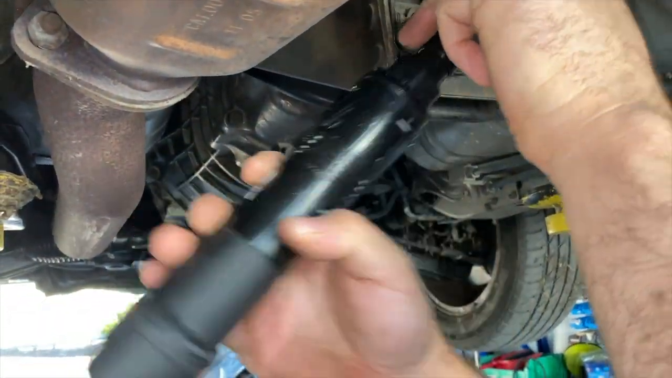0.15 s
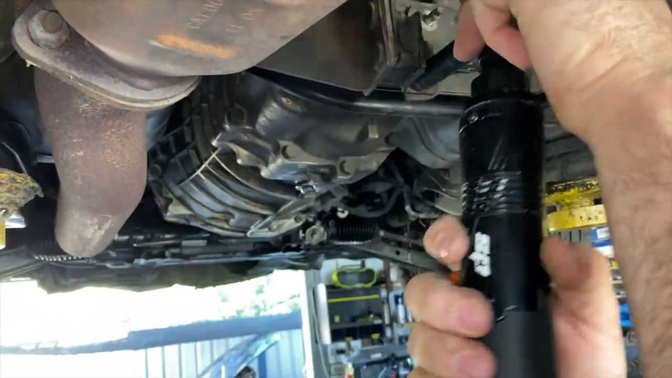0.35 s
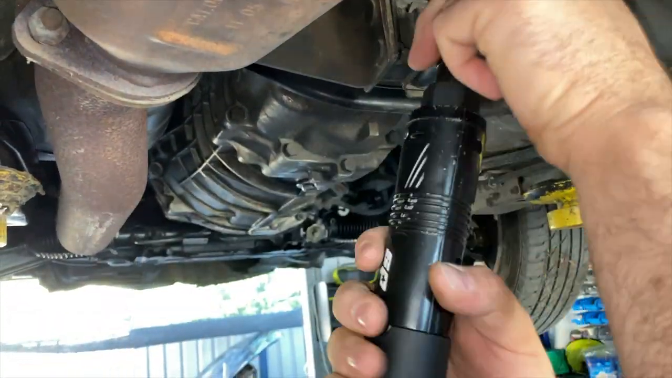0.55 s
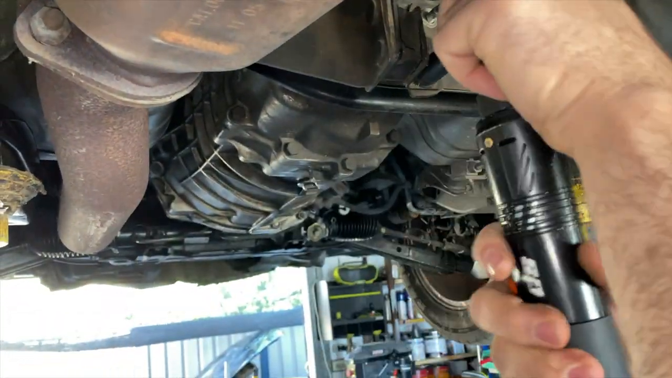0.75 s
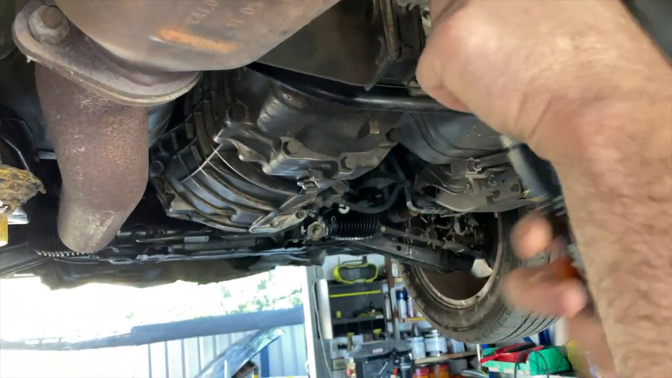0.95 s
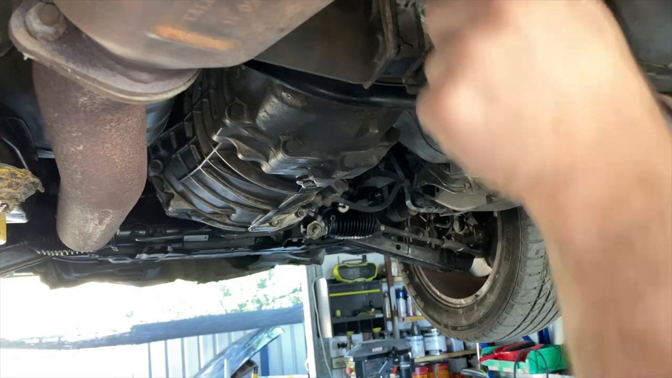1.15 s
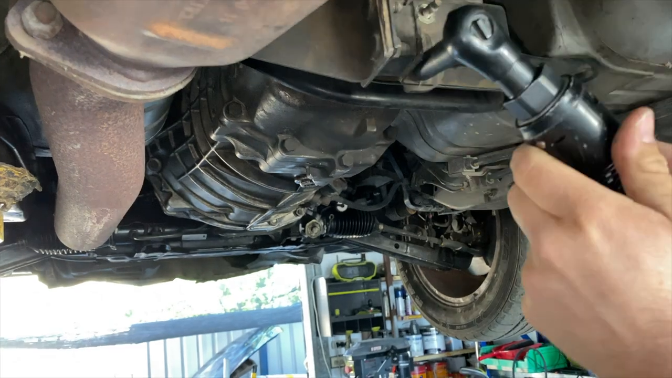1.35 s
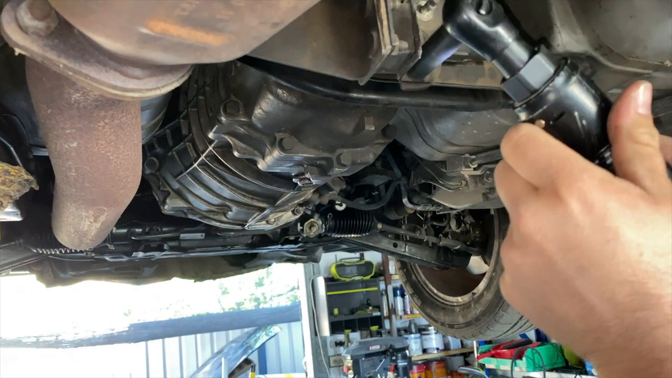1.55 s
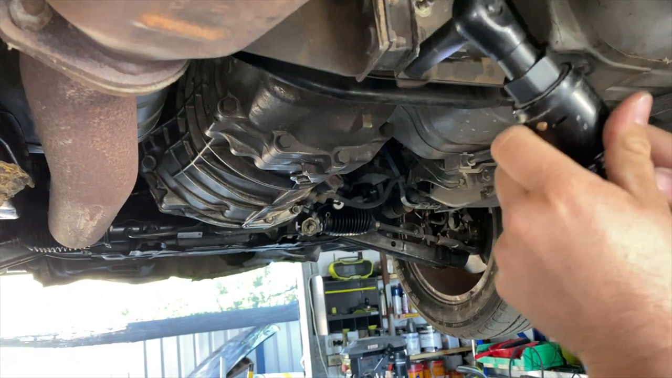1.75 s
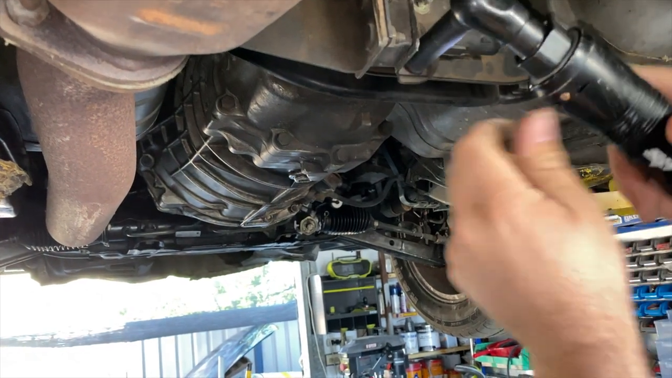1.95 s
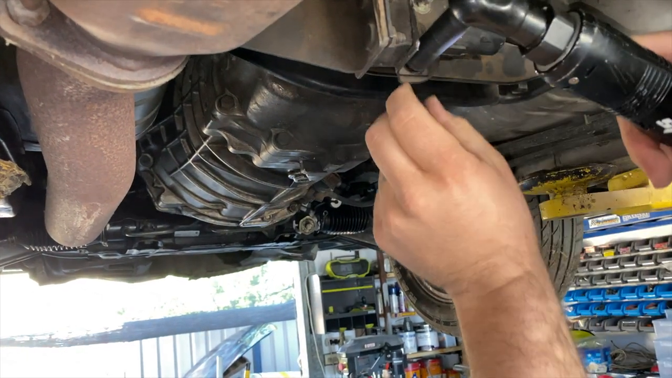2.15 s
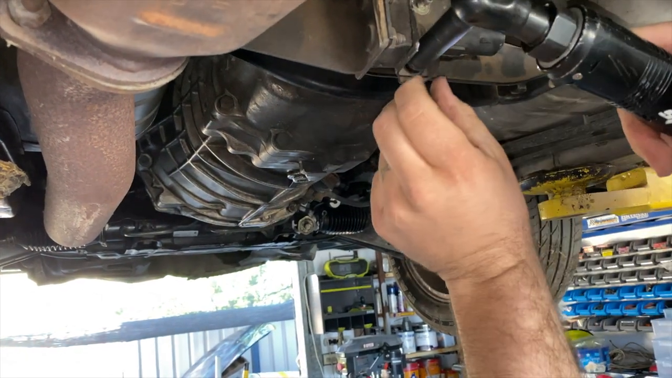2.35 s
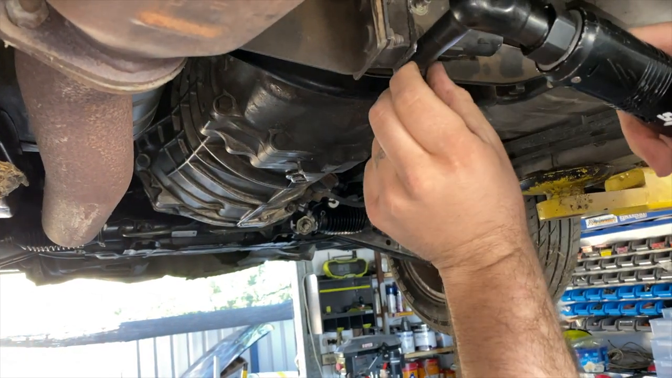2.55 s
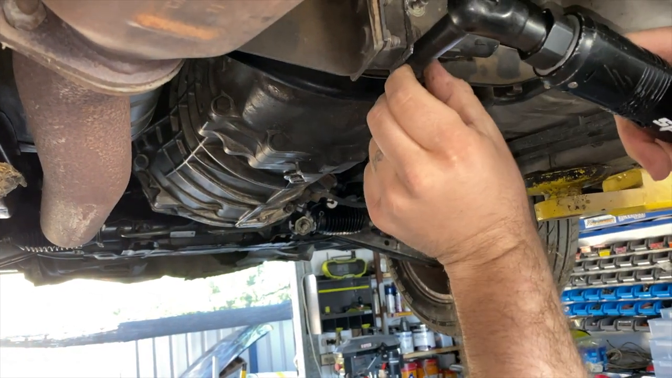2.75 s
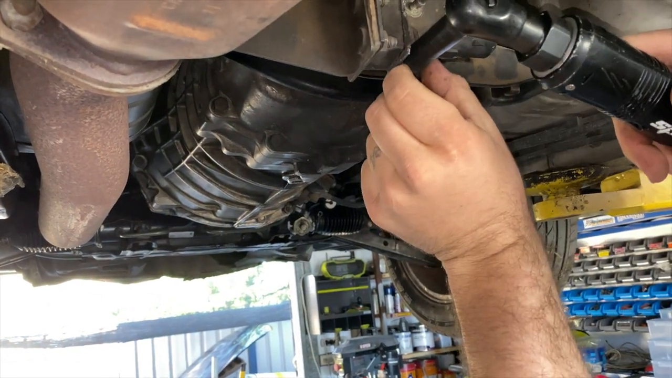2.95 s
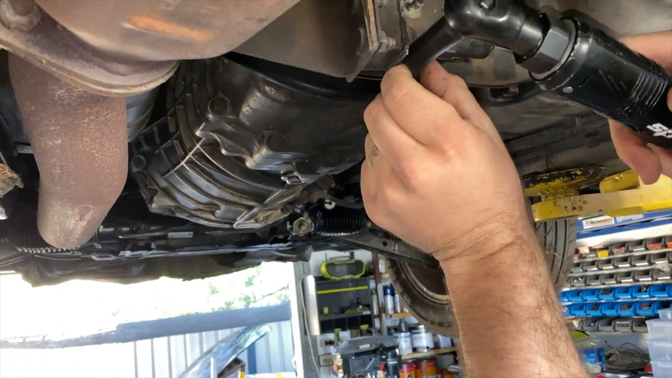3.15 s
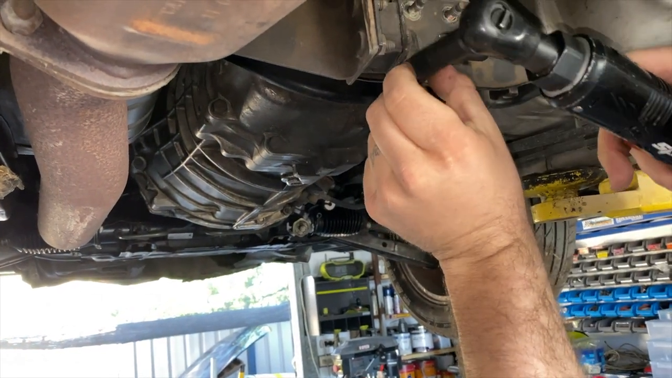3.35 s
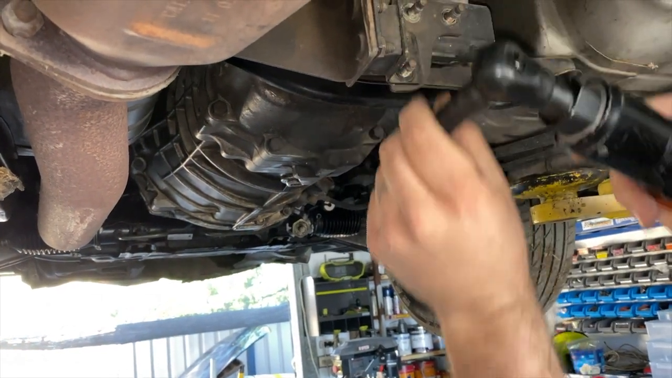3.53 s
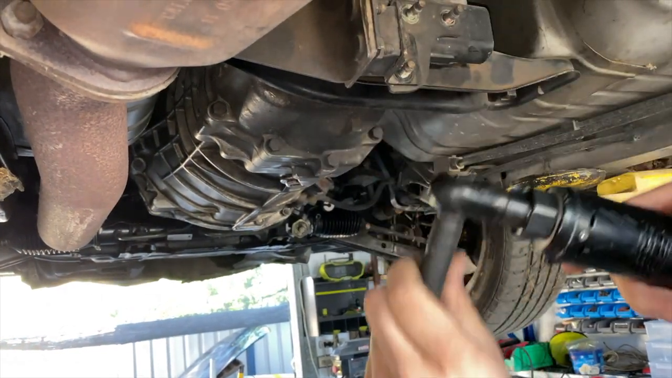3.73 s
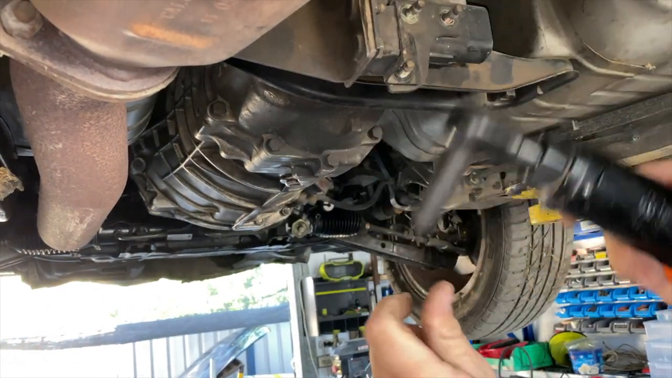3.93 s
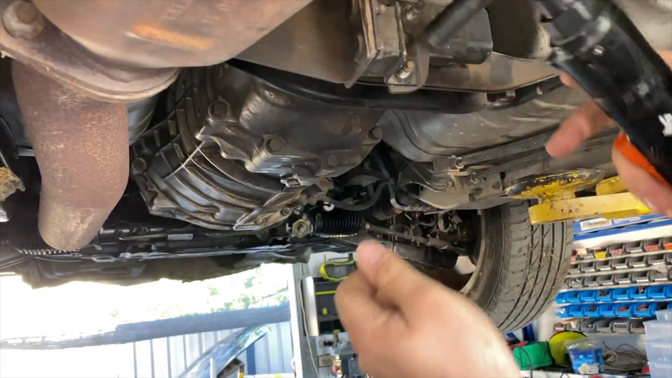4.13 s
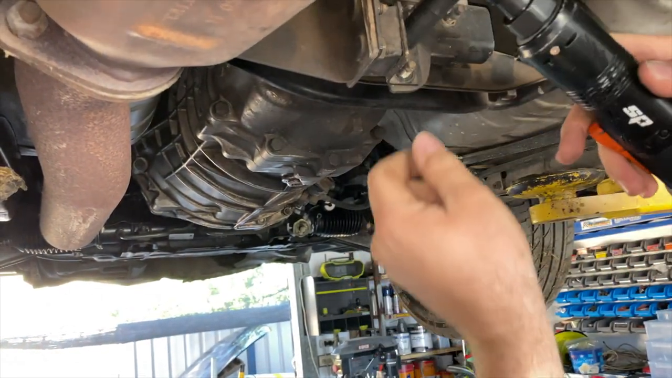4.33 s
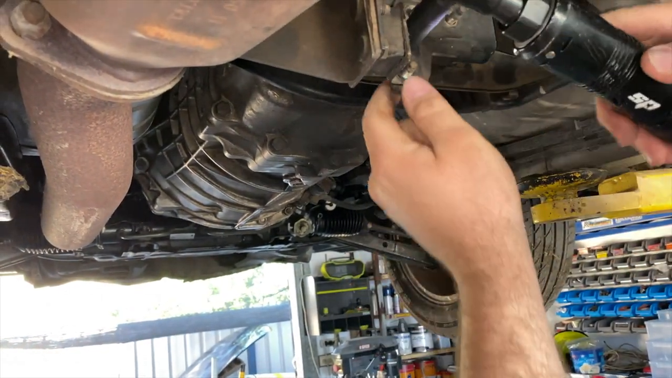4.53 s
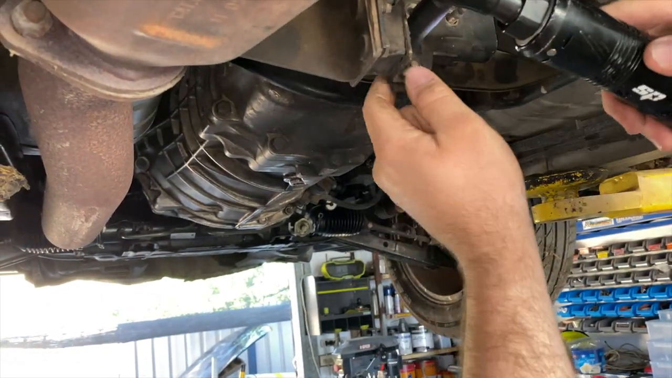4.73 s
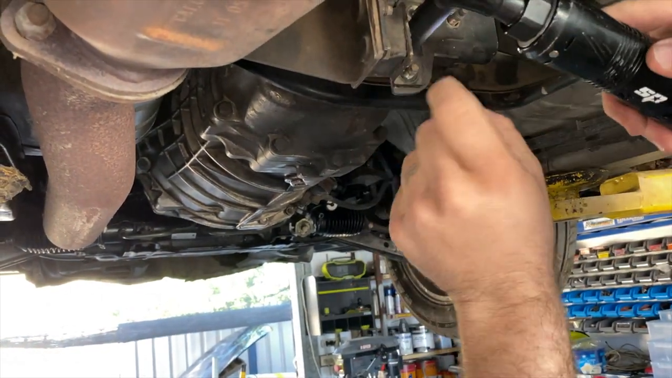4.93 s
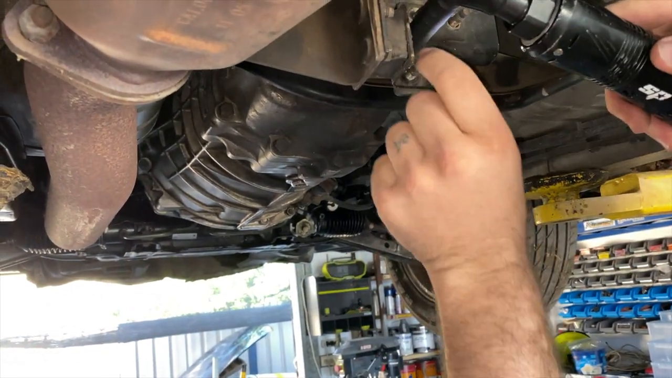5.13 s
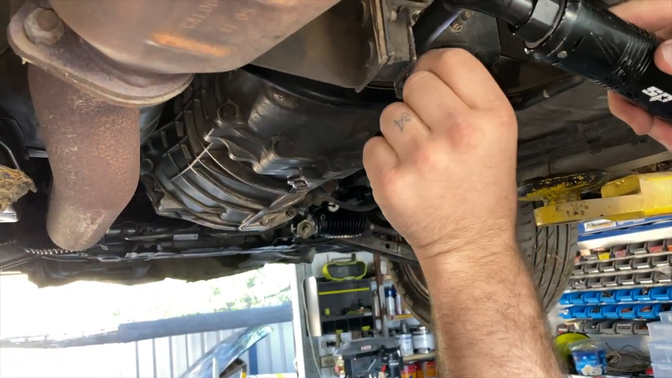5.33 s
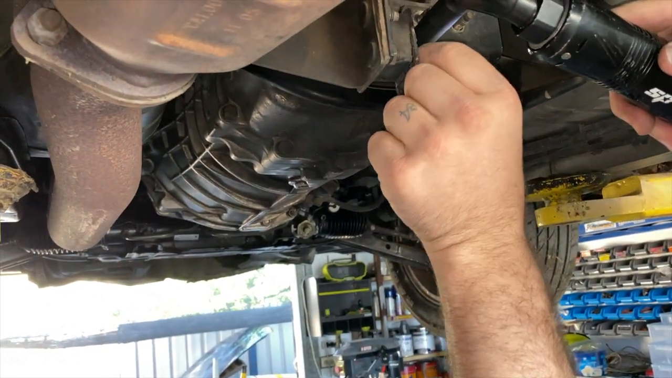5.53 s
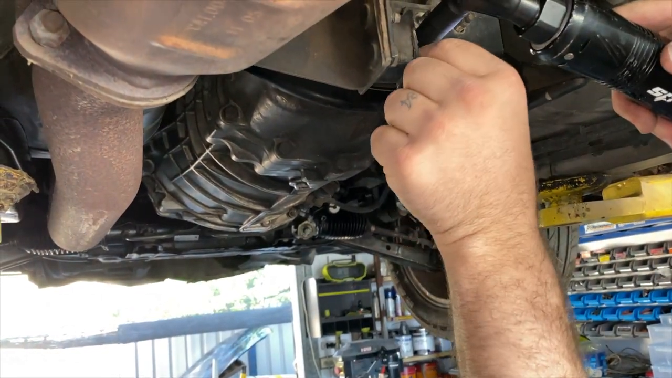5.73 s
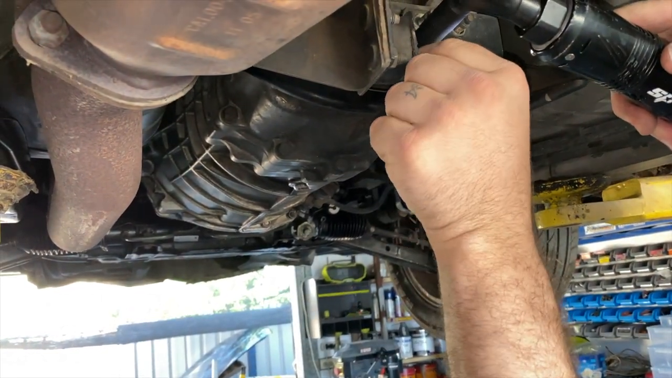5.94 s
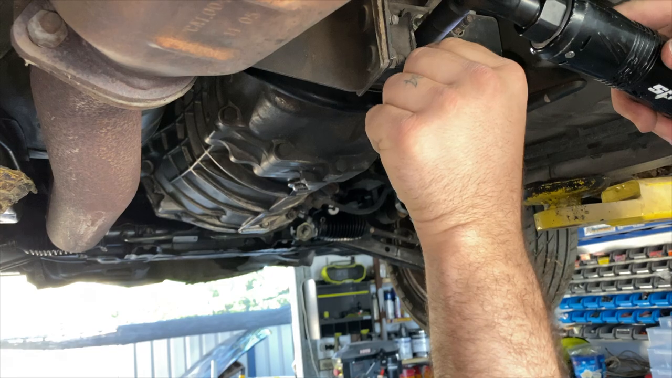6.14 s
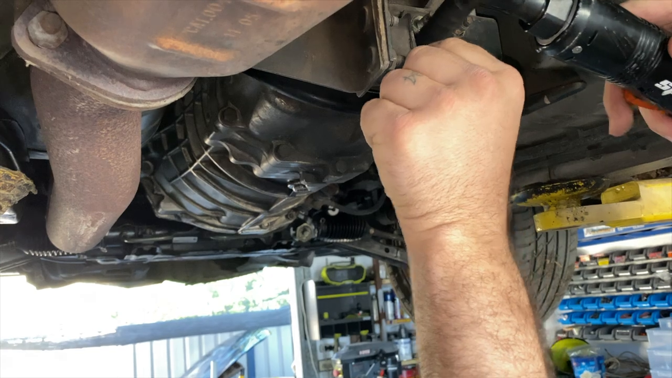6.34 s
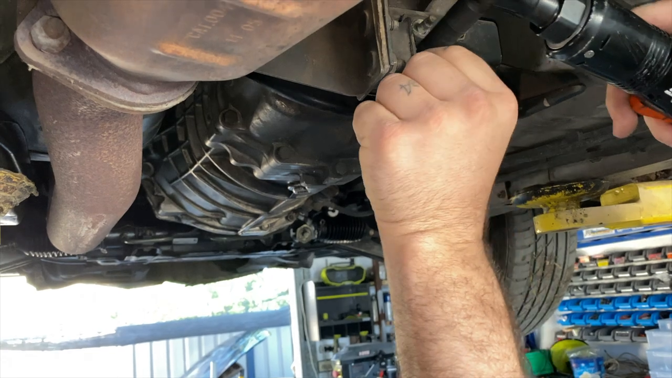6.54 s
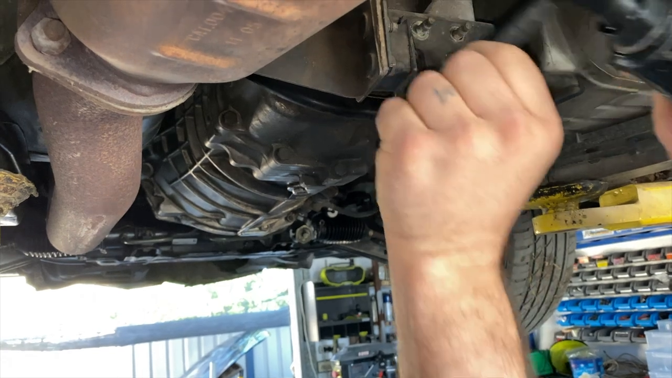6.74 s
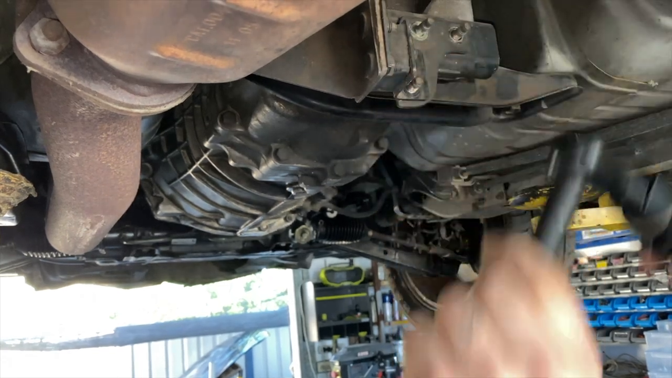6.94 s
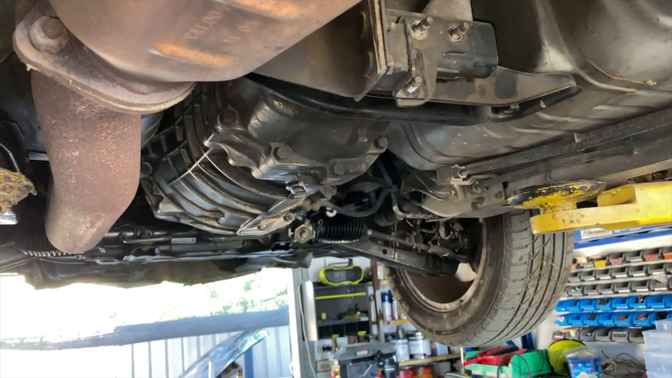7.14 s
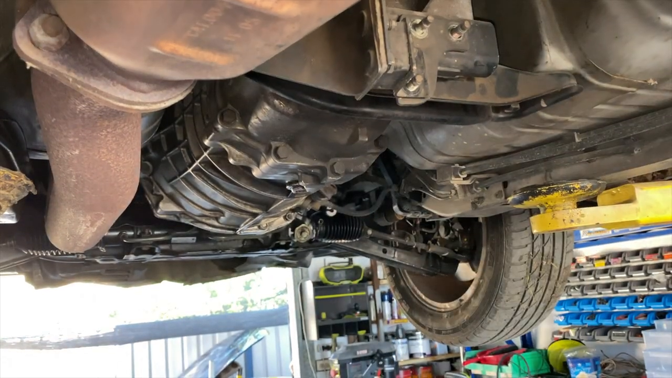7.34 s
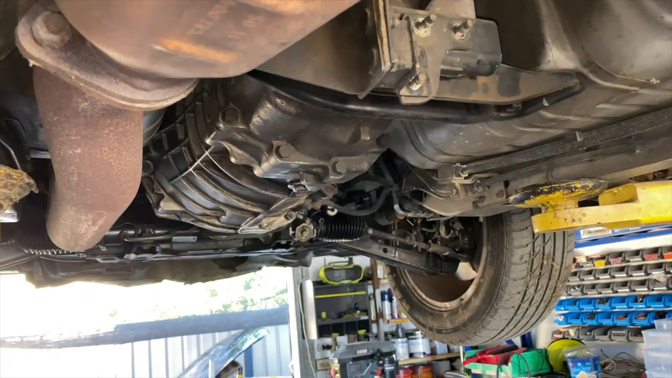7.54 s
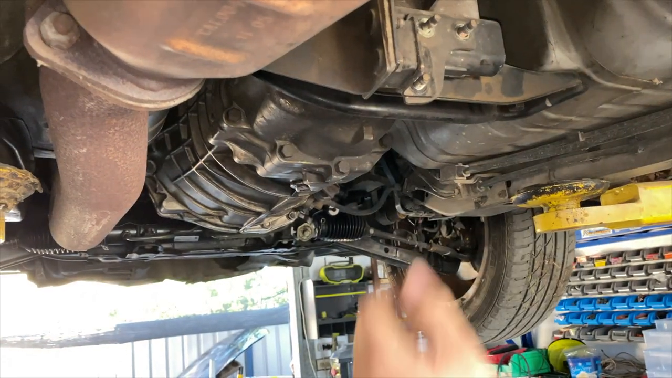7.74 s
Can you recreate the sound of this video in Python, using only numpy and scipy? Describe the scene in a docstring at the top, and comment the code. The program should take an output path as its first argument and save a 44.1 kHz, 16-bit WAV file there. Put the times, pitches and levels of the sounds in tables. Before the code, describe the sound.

In a quiet garage, metal clanks and ticks lead into two harsh, rattling power ratchet bursts, the second duller and easing as its bolt loosens.

```python
"""A knock dies away in a quiet garage; more follow as a socket meets bolt and bracket under a car on a hoist.
Each is a burst of steel-contact noise plus decaying modes, and it leaves the big underbody panels humming.
A sleeve brushes past on the left, as filtered noise. Then a cordless ratchet spins out two bolts: trains of
impacts at about 90 strokes a second excite the resonances of the tool and, through the bolt, of the underbody.
After each run the head coasts down to a few single pawl clicks. A short echo follows knocks and tool."""
import sys
import numpy as np
from scipy import signal
from scipy.fft import rfft, irfft, next_fast_len
from scipy.io import wavfile
from scipy.ndimage import map_coordinates

SR = 44100
rng = np.random.default_rng(int(sys.argv[2]) if len(sys.argv) > 2 else 0)


def generate_wav(sig):
    """Save sig (samples, or channels by samples) to the path in sys.argv[1] as 16-bit PCM at SR."""
    pcm = np.round(np.clip(np.atleast_2d(sig).T, -1, 1) * 32767).astype(np.int16)
    wavfile.write(sys.argv[1], SR, pcm)


N = 347494
TOP_HZ = 15800  # upper band limit


def amp(db):
    """Level law: amplitude ratio of a level in dB."""
    return 10 ** (np.asarray(db) / 20)


def unit(x):
    """Normalisation to an RMS of one."""
    return x / np.sqrt(np.mean(x ** 2) + 1e-20)


def along(points, hz):
    """Interpolation of (f/Hz, value) points on a logarithmic frequency axis."""
    f, value = np.transpose(points)
    return np.interp(np.log(hz + 1), np.log(f + 1), value)


def resonances(modes, hz):
    """Energy summation: gain of (f/Hz, width/Hz, level/dB) resonances whose powers add."""
    power = 0
    for centre, width, db in modes:
        detuning = (hz * hz - centre * centre) / ((hz + 1) * width)
        power = power + amp(db) ** 2 / (1 + detuning ** 2) ** (3 / 2)
    return np.sqrt(power)


def coloured(x, gain):
    """Minimum-phase filtering: x takes on this gain over frequency, keeping the power of white noise."""
    n = x.shape[-1]
    m = 2 * next_fast_len(n // 2 + 4096)
    g = np.maximum(unit(gain(np.fft.rfftfreq(m, 1 / SR))), 1e-5)
    # folding the cepstrum onto positive times makes the filter causal
    cepstrum = irfft(np.log(g))
    cepstrum[1:m // 2] *= 2
    cepstrum[m // 2 + 1:] = 0
    return irfft(rfft(x, m) * np.exp(rfft(cepstrum)), m)[..., :n]


def noise(size):
    """Incoherence: unrelated white noise for left and right."""
    return rng.standard_normal((2, size))


def add(track, s, sound):
    """Superposition: mix in a sound at time s; one that began before zero leaves only its tail."""
    start = round(s * SR)
    sound = sound[:, max(-start, 0):]
    part = track[:, max(start, 0):][:, :sound.shape[1]]
    part += sound[:, :part.shape[1]]


def waver(rate, depth_db):
    """Random modulation: a gain that wanders about 1, with rate knots a second."""
    knots = rng.standard_normal(1000)
    return amp(depth_db * map_coordinates(knots, [np.arange(N) * rate / SR], mode="mirror"))


def since(s):
    """Elapsed time in seconds since s, and zero before it."""
    return np.maximum(np.arange(N) / SR - s, 0)


def impact(crack_t60, scatter_db, scatter_t60, rise=0.00062):
    """Double decay: a steel contact cracks, then rings on densely among the parts nearby (times in s)."""
    t = np.arange(SR // 5) / SR
    decay = np.hypot(amp(-60 * t / crack_t60), amp(scatter_db - 60 * t / scatter_t60))
    return noise(len(t)) * (1 - np.exp(-t / rise)) * decay


def ping(hz, cycles, overtone_db=-7):
    """Free bending vibration: the two lowest modes of a steel piece fall 60 dB within so many cycles."""
    t = np.arange(SR // 8) / SR
    mode = lambda f: np.sin(2 * np.pi * (f * t + rng.random((2, 1))))
    # a high overtone is hardly struck
    overtone = amp(overtone_db) / (1 + (hz / 1600) ** 8) * mode(2.62 * hz)
    return (mode(hz) + overtone) * amp(-60 * t * hz / cycles) * (1 - np.exp(-t * hz / 2))


# background noise spectrum of the quiet garage: [f/Hz, relative level/dB]
AIR_SPECTRUM = [(30, -11), (130, -8), (350, -28), (1400, -29), (4000, -36), (15000, -44)]


def quiet_air(level_db):
    """Stationary random noise: the steady, bass-heavy background."""
    return amp(level_db) * coloured(noise(N), lambda hz: amp(along(AIR_SPECTRUM, hz)))


# broad resonances of underbody and bracket: [f/Hz, width/Hz, relative level/dB]
BODY_RESONANCES = [(492, 90, -7.5), (709, 170, -5), (887, 63, -7), (1020, 160, -8), (1277, 200, -2),
                   (1626, 210, -3), (2027, 56, -6), (2290, 430, -6), (2930, 290, -5), (3360, 310, -6.5),
                   (3630, 150, -3.5), (4210, 1100, -6.5), (6900, 3000, -14.5)]
# lasting modes of the underbody: [f/Hz, relative level/dB, t60/s]
STEEL_MODES = [(275, -20, 0.35), (393.3, -11, 0.26), (457, -16.5, 0.13), (497, -22.5, 0.4),
               (823, -2.5, 0.3), (869, -5, 0.27), (1123, -9.5, 0.13), (1251, -8.5, 0.13), (1592, -2, 0.1)]
# extra resonance in the ticks: [f/Hz, width/Hz, relative level/dB]
SOCKET_RESONANCE = [(10900, 900, -18)]
# socket meets bolt and bracket; the first knock is already dying away at the start:
# [t/s, relative level/dB, ring f/Hz, thud re knock level/dB, tick re knock level/dB]
KNOCKS = [(-0.04, -17, 1250, -7, -20), (0.045, -13.5, 1220, -9.5, -19), (0.062, -17.5, 1280, -19, -22),
          (0.166, -36.5, 5330, -20, -16), (0.21, -31.5, 1170, -28, -2), (0.234, -28, 1087, -8.5, -19),
          (0.282, -24.5, 1235, -3.5, -18), (0.29, -22, 1240, -3.5, -10.5), (0.312, -26, 1000, -10, -23),
          (0.33, -19, 1092, -16, -20), (0.469, -29.5, 1690, 0.5, -23), (0.567, -26, 1670, -7, -44),
          (0.591, -26.5, 1410, -9.5, -24), (0.623, -23.5, 1620, -7.5, -23),
          (0.643, -17.5, 2230, -7.5, -18.5), (0.664, -31.5, 1580, -6.5, -5.5),
          (0.779, -25, 3660, -23.5, -7), (0.998, -34, 1370, -13, -14.5), (1.052, -34.5, 4930, -16.5, -17),
          (1.132, -21, 1260, -15, -18), (1.234, -20, 3200, -17, -20.5), (1.24, -16.5, 1276, -11.5, -9),
          (1.391, -18.5, 1262, -27, -18.5), (1.445, -10.5, 2790, -19, -13.5), (4.224, -17, 3330, -16, -12),
          (4.25, -35, 935, -3.5, -25), (4.307, -25.5, 7100, -11.5, -3), (4.324, -24, 1530, -13.5, -15.5),
          (4.515, -39.5, 3800, -30, -7), (4.546, -32, 1660, -5, -27.5), (7.738, -57.5, 1930, -15, -40)]


def knocks(thud_db, clank_db, tick_db, ping_db, ring_db, ping_cycles, swell_s):
    """Modal excitation: bracket thud, pitched socket clank and tick, leaving the steel modes ringing."""
    thuds, clanks, ticks, rings = np.zeros((4, 2, N))
    t = np.arange(SR) / SR

    def mode(hz, t60):
        wave = np.sin(2 * np.pi * (hz * t + rng.random((2, 1))))
        return amp(-60 * t / t60) * (1 - np.exp(-t / swell_s)) * wave

    for s, db, hz, thud, tick in KNOCKS:
        thud_hit = impact(crack_t60=0.016, scatter_db=-23.0, scatter_t60=0.25, rise=0.003)
        clank_hit = impact(crack_t60=0.016, scatter_db=-14.5, scatter_t60=0.066, rise=0.002)
        tick_hit = impact(crack_t60=0.0069, scatter_db=-15.5, scatter_t60=0.038, rise=0.0019)
        add(thuds, s, amp(db + thud + thud_db) * thud_hit)
        add(clanks, s, amp(db + clank_db) * clank_hit)
        add(ticks, s, amp(db + tick + tick_db) * tick_hit)
        # a light touch leads the blow
        touch = impact(crack_t60=0.0032, scatter_db=-25.5, scatter_t60=.04)
        add(clanks, s - .004, amp(db - 13.0) * touch)
        add(rings, s, amp(db + ping_db) * ping(hz, ping_cycles))
        steel = sum(amp(level + rng.normal(0, 1.0)) * mode(f, t60) for f, level, t60 in STEEL_MODES)
        add(rings, s, amp(db + thud + ring_db) * steel)

    low = lambda hz, edge_hz: 1 / np.sqrt(1 + (hz / edge_hz) ** 8)
    high = lambda hz, edge_hz: np.sqrt(1 - low(hz, edge_hz) ** 2)
    body = lambda hz: resonances(BODY_RESONANCES, hz)
    thuds = coloured(thuds, lambda hz: body(hz) * low(hz, 1220))
    clanks = coloured(clanks, lambda hz: body(hz) * high(hz, 1660) * low(hz, 2820))
    ticks = coloured(ticks, lambda hz: resonances(BODY_RESONANCES + SOCKET_RESONANCE, hz) * high(hz, 4030))
    return rings + thuds + clanks + ticks


# low modes of the underbody's big panels: [f/Hz, width/Hz, relative level/dB]
PANEL_MODES = [(71, 11, 1), (117.5, 12, 1.5), (172, 110, -6), (355, 13, 2), (479, 87, -6), (900, 1000, -15)]


def drone(speed, force_db, share_db, knock_db, bolt_db, hand_db, t60):
    """Forced vibration: panels hum after knocks and while the tool shakes them through bolt and hand."""
    knocked = 0
    for s, db, _, thud, _ in KNOCKS:
        knocked = knocked + amp(db + thud + knock_db - 60 * since(s) / t60) ** 2 * (since(s) > 0)
    shaken = speed * amp(force_db) ** 2 * (amp(share_db + bolt_db) ** 2 + amp(hand_db) ** 2)
    return np.sqrt(knocked + shaken) * coloured(noise(N), lambda hz: resonances(PANEL_MODES, hz))


# reverberation time of the garage: [f/Hz, t60/s]
ECHO_DECAY = [(200, 0.087), (1000, 0.38), (4000, 0.36), (9000, 0.12), (15000, 0.042)]


def garage(x):
    """Reverberation: convolution with decaying noise whose treble dies before its midrange."""
    hz, t, z = signal.stft(noise(SR), SR, nperseg=256)
    decay = amp(-60 * t / along(ECHO_DECAY, hz)[:, None])
    tail = signal.istft(z * decay, SR, nperseg=256)[1]
    # the echo starts 400 samples late
    tail = np.pad(tail / np.linalg.norm(tail[0]), ((0, 0), (400, 0)))
    return signal.fftconvolve(x, tail, axes=1)[:, :N]


# soft bumps on the microphone: [t/s, relative level/dB]
BUMPS = [(0.621, -45), (5.3, -57), (6.233, -53.5)]


def bumps(pitch_hz):
    """Narrow-band noise bursts: dull swells of bass as the microphone is jostled."""
    track, swell = np.zeros((2, N)), np.hanning(int(.14 * SR))
    for s, db in BUMPS:
        add(track, s, amp(db) * swell * noise(len(swell)))
    return coloured(track, lambda hz: resonances([(pitch_hz, pitch_hz / 2, 0)], hz))


SLEEVE_S, SLEEVE_DB = 1.071, -42  # loudest moment of the sleeve, and level there before panning
SLEEVE_RISE_DB_PER_S, SLEEVE_FALL_DB_PER_S = 121, 86
# spectrum of the rubbing cloth: [f/Hz, relative level/dB]
CLOTH_SPECTRUM = [(300, 3), (1350, -1.5), (1900, -8.5), (4200, 1.5), (4950, 5.5), (5600, -2.5), (8000, -9),
                  (13000, -30.5)]


def sleeve(left_db):
    """Friction noise: cloth slides by near the left port, one uneven swell as the arm swings round."""
    t = np.arange(N) / SR - SLEEVE_S
    level_db = SLEEVE_DB + np.minimum(SLEEVE_RISE_DB_PER_S * t, -SLEEVE_FALL_DB_PER_S * t)
    swell = waver(rate=190, depth_db=3.0) * amp(level_db)
    cloth = coloured(noise(N), lambda hz: amp(along(CLOTH_SPECTRUM, hz)))
    return swell * amp([[left_db], [-left_db]]) * cloth


# one ratchet run per bolt: [trigger pulled t/s, thread gives t/s, loosening time constant/s, trigger let go t/s,
# change of force while the thread grips/dB, underbody share while tight/dB, same once loose/dB,
# drive whistle level/dB]
BOLTS = [(1.415, 2.098, 0.021, 3.251, 1.5, -2, -9.5, -35), (4.523, 4.525, 0.23, 6.282, -2.5, 3.5, -20, -67)]


def whistle(pitch_hz, length, lead):
    """Pure-tone radiation: the switching of the drive sings briefly as the trigger is pulled (times in s)."""
    track, t = np.zeros((2, N)), np.arange(int(length * SR)) / SR
    for s, *_, db in BOLTS:
        tone = np.sin(2 * np.pi * (pitch_hz * t + rng.random((2, 1))))
        add(track, s - lead, amp(db) * signal.windows.tukey(len(t)) * tone)
    return track


FULL_RATE_HZ, STALL_HZ = 89.7, 13  # strokes a second at full speed, and where friction stops the head
SPIN_UP_S, COAST_S, FRICTION_HZ_PER_S = .06, .66, 42  # time constants of motor and drag; steady braking


def stroke_rate():
    """First-order motor dynamics: exponential spin-up, then drag and dry friction down to a stall."""
    rate, brake = np.zeros(N), FRICTION_HZ_PER_S * COAST_S
    for start, _, _, release, *_ in BOLTS:
        driven = FULL_RATE_HZ * (1 - np.exp(-since(start) / SPIN_UP_S))
        rate += np.maximum((driven + brake) * np.exp(-since(release) / COAST_S) - brake, 0)
    return rate * (rate > STALL_HZ) * waver(rate=7, depth_db=.07)


FORCE_DB, EASE_DB_PER_S = 1.5, 2.5  # force of the impacts, and its fall as the bolt unwinds


def load():
    """Load coupling: impact force and underbody share in dB shift as the thread gives; the force eases."""
    force_db, share_db = np.zeros((2, N))
    for start, gives, loosening, _, grip_db, tight_db, loose_db, _ in BOLTS:
        grip, on = np.exp(-since(gives) / loosening), since(start) > 0
        force_db[on] = (FORCE_DB + grip_db * grip - EASE_DB_PER_S * since(start))[on]
        share_db[on] = (tight_db * grip + loose_db * (1 - grip))[on]
    return force_db, share_db


SWELL_DB = 4.0  # level swell once a stroke, at full speed
SPREAD_DB = 1.7  # standard deviation from contact to contact at full speed


def clatter(speed, turns, growth, count):
    """Repeated impact: count contacts a stroke, harder with head speed and hardest as the head turns.
    Each contact point rings in its own way; the slower the head, the more uneven the contacts."""
    track, pitches = np.zeros((2, N)), np.linspace(1500, TOP_HZ, 8)
    rings = []
    for pitch in pitches:
        crack = unit(impact(crack_t60=0.0044, scatter_db=-16.5, scatter_t60=0.042)[:, :SR // 20])
        rings.append(coloured(crack, lambda hz: 1 + resonances([(pitch, 3000, 3)], hz)))
    late, point, side, chance = rng.random((4, 9000))
    uneven = np.sqrt(3) * (2 * chance - 1)  # uniform, with unit variance
    for k in range(int(turns[-1] * count)):
        turn = (k + late[k]) / count
        at = min(np.searchsorted(turns, turn), N - 1)
        swell_db = SWELL_DB * speed[at] * np.cos(2 * np.pi * turn)
        db = swell_db + SPREAD_DB * uneven[k] / max(speed[at], .3)
        strength = np.sign(side[k] - .5) * amp(db) * speed[at] ** growth
        add(track, at / SR, strength * rings[int(point[k] * len(rings))])
    return unit(track)


# resonances of head, socket and bolt:
# [f/Hz, width/Hz, first bolt relative level/dB, second bolt relative level/dB]
TOOL_RESONANCES = [(381, 49, -13, -17), (859, 54, -6, -16), (1040, 1500, -15, -16.5), (1180, 182, -4, -8),
                   (1744, 330, -1.5, -1.5), (1994, 630, -7.5, -9.5), (2627, 89, -1.5, -6.5),
                   (2985, 110, -9.5, -5), (3674, 330, -1.5, -4.5), (4140, 1840, -2.5, -8),
                   (5893, 74, -3, -4), (6500, 740, 0.5, -7.5), (7710, 2100, -2, -6), (10180, 2100, -3, -9),
                   (11180, 300, -4.5, -1), (13600, 840, 4, -1.5), (14800, 11000, -6.5, -11)]
# motor hum: [multiple of the stroke rate, relative level/dB]
HUM_HARMONICS = [(3, 0.5), (6, -4.5)]


def ratchet(rate, force_db, share_db, first_db, second_db, shake_db, ring_db, hum_db):
    """Source and transmission: the rocking head's impacts sound in the tool and, via the bolt, the underbody."""
    speed, turns = rate / FULL_RATE_HZ, np.cumsum(rate) / SR
    impacts = clatter(speed, turns, growth=1.396, count=11)
    rattle = amp(force_db) * impacts * waver(rate=45, depth_db=0.88)

    on_second = np.arange(N) / SR > BOLTS[-1][0] - .1
    first_modes = np.delete(TOOL_RESONANCES, -1, axis=1)
    second_modes = np.delete(TOOL_RESONANCES, -2, axis=1)
    first = coloured(rattle * ~on_second, lambda hz: resonances(first_modes, hz))
    second = coloured(rattle * on_second, lambda hz: resonances(second_modes, hz))

    # a mode's width varies inversely with its decay time
    narrow = [(hz, np.log(1000) / np.pi / t60 * 2, db) for hz, db, t60 in STEEL_MODES]
    shaken = amp(shake_db) * coloured(rattle, lambda hz: resonances(BODY_RESONANCES, hz))
    ringing = amp(ring_db) * coloured(rattle, lambda hz: resonances(narrow, hz))

    # the hum only meets the panels' resonance near full speed
    tones = sum(amp(hum_db + db) * np.sin(2 * np.pi * round(k) * turns) for k, db in HUM_HARMONICS)
    hum = amp(force_db) * speed ** 9 * waver(rate=25, depth_db=3.0) * tones
    underbody = amp(share_db) * (shaken + ringing + hum)
    return amp(first_db) * first + amp(second_db) * second + underbody


# the head slams against the tight thread of the first bolt: [t/s, relative level/dB]
SLAMS = [(1.479, -6.5), (1.536, -11), (1.565, -3), (1.617, -9.5), (1.627, -14.5), (1.661, -12), (1.74, -10),
         (1.835, -20), (1.986, -11)]


def slams(crack_db, ping_db, pitch_hz):
    """Impulsive excitation: the hardest blows stand out of the clatter, each with a clank of its own."""
    cracks, pings = np.zeros((2, 2, N))
    for s, db in SLAMS:
        crack = impact(crack_t60=0.013, scatter_db=-16.0, scatter_t60=.05)
        add(cracks, s, amp(db + crack_db) * crack)
        pitch = pitch_hz * np.exp(rng.standard_normal() / 2)
        add(pings, s, amp(db + ping_db) * ping(pitch, cycles=32))
    return pings + coloured(cracks, lambda hz: resonances(BODY_RESONANCES, hz))


# the pawl drops over its last teeth: [t/s, relative level/dB]
PAWL_CLICKS = [(3.731, -26), (3.77, -30), (3.818, -26), (3.8266, -27), (3.889, -26), (3.908, -30),
               (3.9713, -30), (3.9917, -28.5), (4.0337, -34), (6.7592, -24), (6.7948, -22.5), (6.8196, -29),
               (6.865, -27), (6.9206, -29.5), (6.9318, -39), (6.95, -35), (7.0062, -30.5), (7.024, -29.5),
               (7.0564, -30)]


def pawl(click_db, tooth_hz, tooth_db):
    """Resonant impact: bright single clicks as the head comes to rest, each tooth with its own pitch."""
    track = np.zeros((2, N))
    for s, db in PAWL_CLICKS:
        pitch = tooth_hz * np.exp(rng.standard_normal() / 2)
        click = impact(crack_t60=0.012, scatter_db=-4, scatter_t60=0.035, rise=0.0017)
        click = coloured(click, lambda hz: 4.0 + resonances([(pitch, pitch / 5, tooth_db)], hz))
        add(track, s, amp(db + click_db) * click)
    # [f/Hz, width/Hz, relative level/dB]
    free_head = [(1190, 280, 3.3), (1910, 590, 6.1), (4030, 910, 4.3), (8400, 19000, 0.56), (13400, 1000, 10)]
    return coloured(track, lambda hz: resonances(free_head, hz))


def scene():
    """Superposition: knocks and ratchet in the garage; motor speed and bolt load drive tool and panels."""
    air = quiet_air(level_db=-72.0)
    hits = knocks(thud_db=12.0, clank_db=-0.5, tick_db=15, ping_db=-3, ring_db=-6.0,
                  ping_cycles=48, swell_s=0.0032)
    rate = stroke_rate()
    force_db, share_db = load()
    panels = drone(rate / FULL_RATE_HZ, force_db, share_db, knock_db=-23.5, bolt_db=-47.5,
                   hand_db=-60.5, t60=2.1)
    near = panels + bumps(pitch_hz=66.5) + sleeve(left_db=4.5)
    tool = whistle(pitch_hz=7800, length=0.055, lead=0.008)
    tool = tool + ratchet(rate, force_db, share_db, first_db=-24.0, second_db=-24.0, shake_db=-30.0,
                          ring_db=-34.5, hum_db=-48.5)
    tool = tool + slams(crack_db=-5.0, ping_db=-12.5, pitch_hz=1663)
    tool = tool + pawl(click_db=0.0, tooth_hz=4960, tooth_db=0.0)
    echo = garage(amp(-15.0) * hits + amp(-10.5) * tool)
    return hits + tool + echo + near + air


OVERLOAD = .66  # ceiling that the rounded peaks approach, before the ports are mixed (share of full scale)
# the two microphone ports: [f/Hz, likeness 0-1, phase by which left leads/rad]
PORTS = [(200, .45, .1), (1500, .35, .8), (4000, .2, .5), (6300, .3, .3), (7800, .25, -2.8),
         (9100, .45, -2.9), (10400, .88, -.2), (11600, .88, .2), (12400, .78, 1.6), (13400, .98, 3.15),
         (14600, .75, 4.5), (15400, .95, 6.2)]
# some pitches favour one port: [f/Hz, level added to left and taken from right/dB]
SIDES = [(200, -1), (272, -7), (400, -0.5), (850, -1), (1200, 0.5), (4000, 1), (6000, -1), (13000, -0.5)]


def record(dry):
    """Saturation and interchannel coherence: peaks are rounded off, and two ports share part of the
    sound at a phase that turns with frequency, below a band limit."""
    m = next_fast_len(N + SR // 2)
    hz = np.fft.rfftfreq(m, 1 / SR)
    at_hz, likeness, lead = np.transpose(PORTS)
    # mixing by this angle gives independent ports the wanted likeness
    mix = np.arcsin(np.clip(np.interp(hz, at_hz, likeness), 0, 1)) / 2
    turn = np.exp(np.outer([1j, -1j], np.interp(hz, at_hz, lead) / 2))
    turn = turn * amp(np.outer([1, -1], along(SIDES, hz)))
    rounded = dry / (1 + (dry / OVERLOAD) ** 4) ** .25
    z = rfft(rounded, m)
    mixed = np.cos(mix) * z + np.sin(mix) * z[::-1]
    band = np.clip((TOP_HZ - hz) / 400 + .5, 0, 1)
    return irfft(mixed * turn * band, m)[:, :N]


dry = scene()
out = record(dry)
generate_wav(out)
```